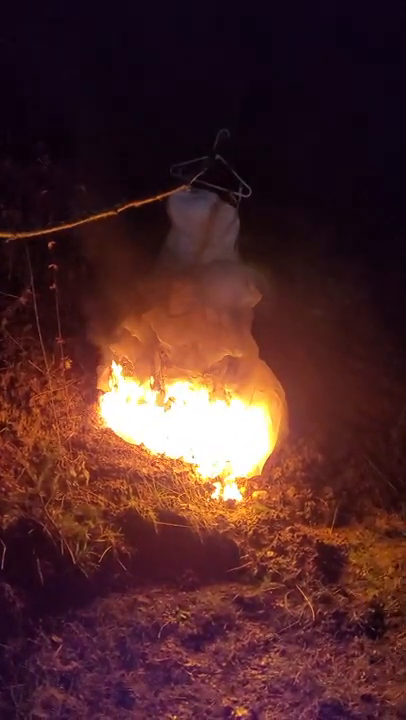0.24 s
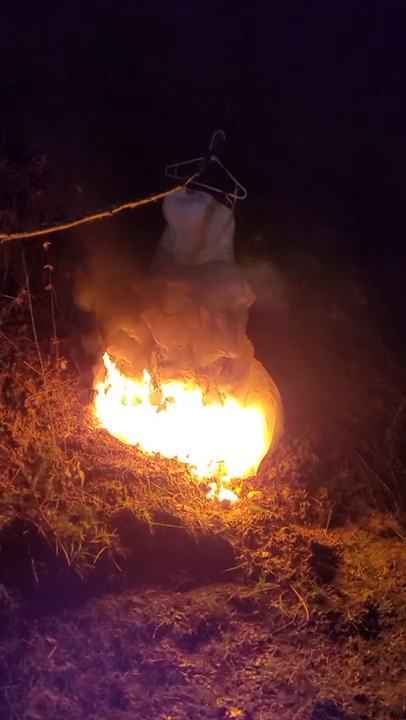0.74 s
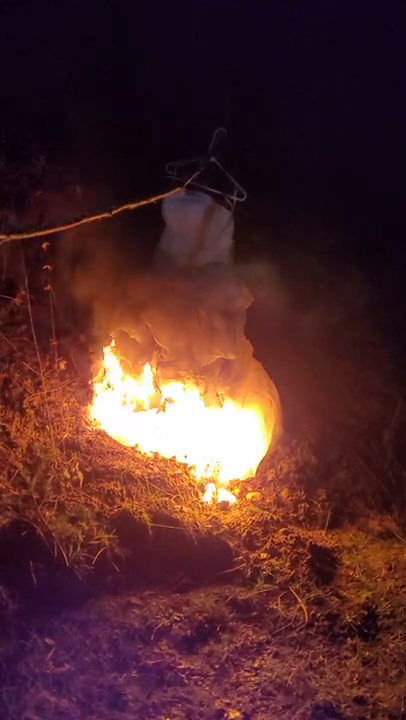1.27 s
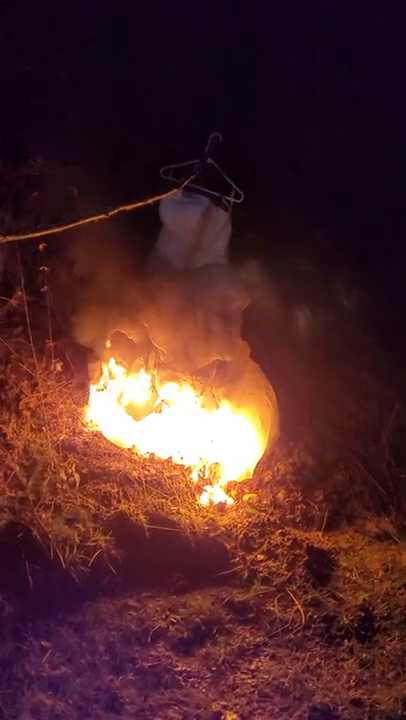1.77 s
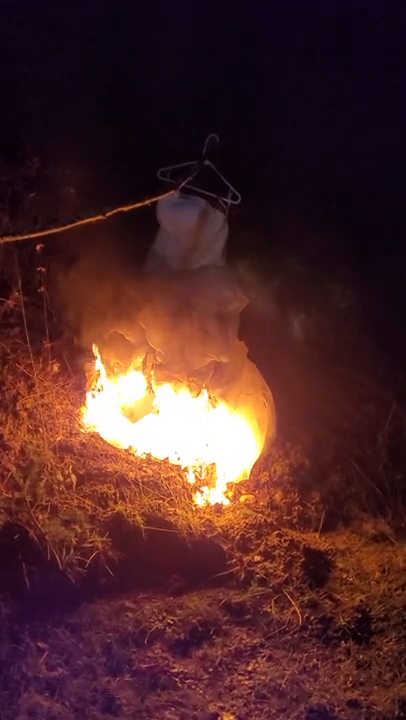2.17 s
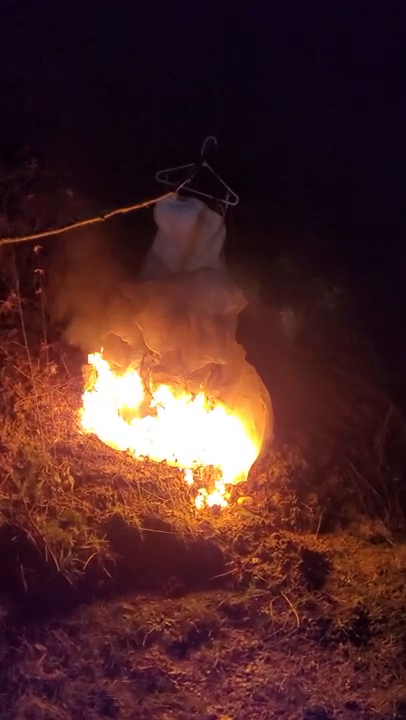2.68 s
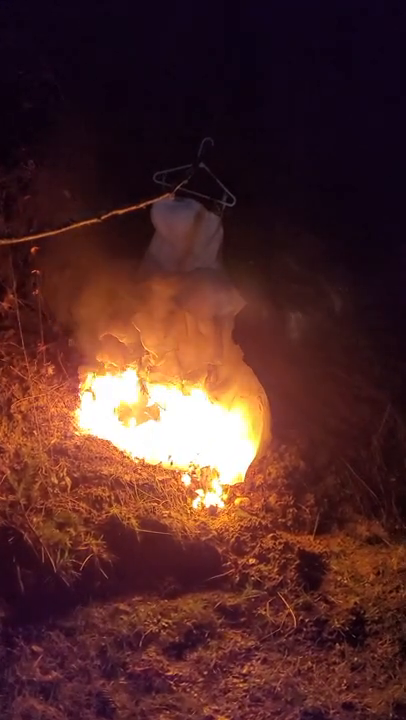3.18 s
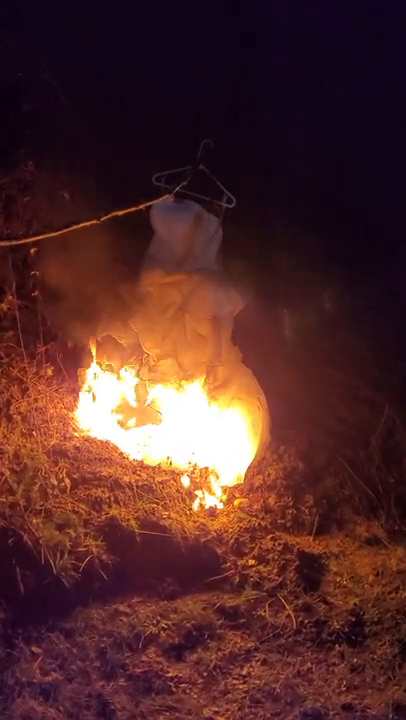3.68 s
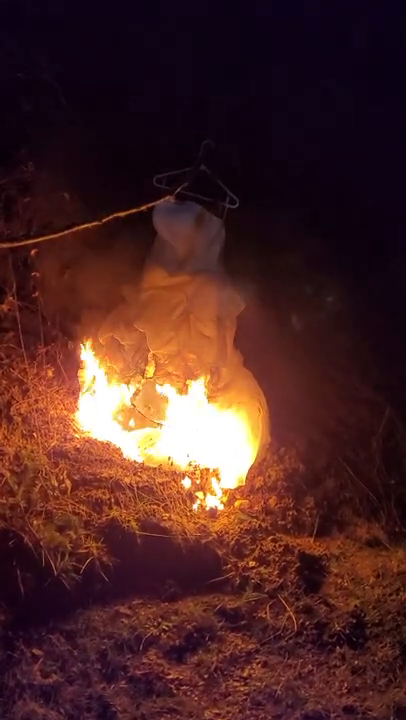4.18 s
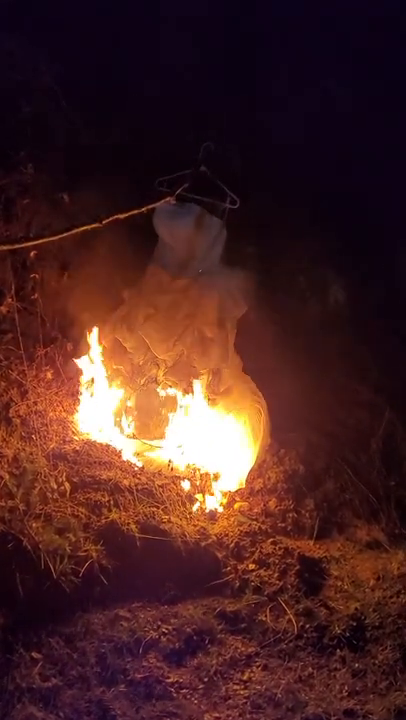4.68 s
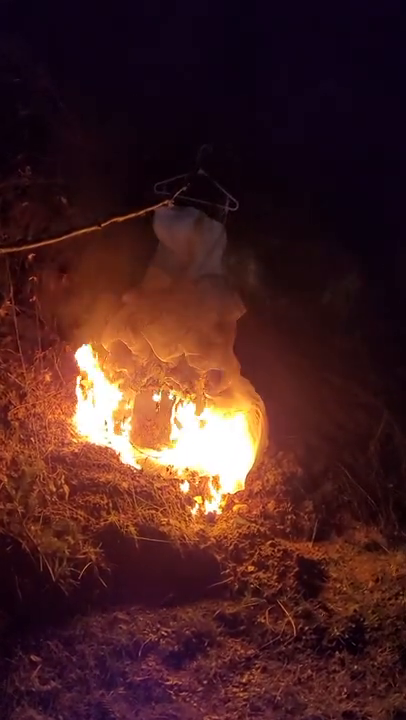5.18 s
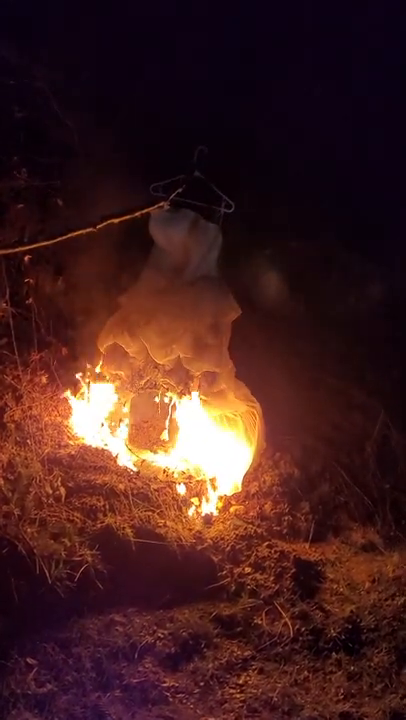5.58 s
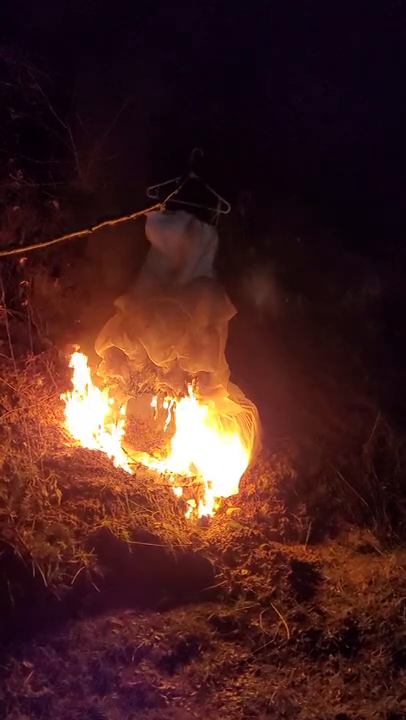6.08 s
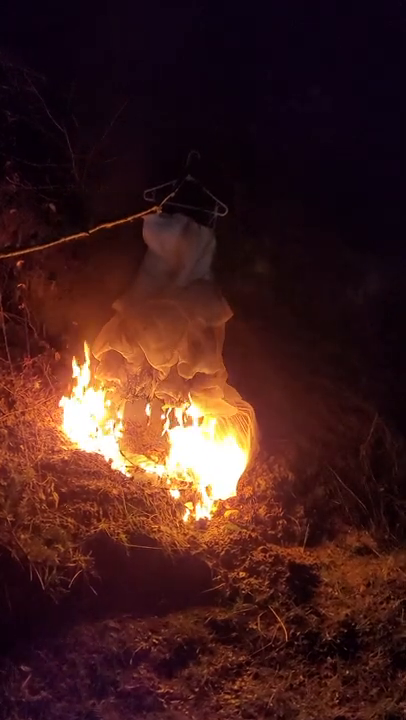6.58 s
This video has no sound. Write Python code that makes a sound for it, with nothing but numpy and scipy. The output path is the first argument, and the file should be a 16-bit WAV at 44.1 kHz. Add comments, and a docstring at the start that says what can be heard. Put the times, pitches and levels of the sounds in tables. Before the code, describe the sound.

Burning cloth and dry grass outdoors at night, about 7 seconds, in wide stereo with the crackle leaning right. A quiet low rumble and soft flickering roar run throughout, under thin gritty hiss and sizzle. It starts almost bare; from 0.4 to 0.7 s a tight flurry of sharp snaps arrives with a brief swell of hiss, then a strong snap at 0.86. Sparse pops follow, notably at 1.56, with faint vapour puffs between. From 2.3 to 3.2 s snaps come more often, ending in a bright pair at 3.2. After a thinner stretch, a dense cluster begins at 4.0 and peaks at 4.38 with the loudest crack, carrying a short low thump. Crackling stays busy to 5.5, including a cluster near 5.45, then scatters, with single snaps at 6.2 and 6.55 and a final flurry from 6.7. Each is dry, with a tiny scattered tail.

```python
"""Short cracks first: pockets of hot gas burst in a hanging cloth and the dry grass below it,
burning outdoors at night. Each is a pressure step, spiky tearing noise and scatter off ground and scrub.
Larger bursts add a low swing of air, and jets of vapour hiss in bands of their own.
Under them escaping gas hisses as noise with fine ticks, and the flames rumble and roar as flickering noise.
Two microphone ports hear it, the right one nearer the fire."""
import sys
import numpy as np
from scipy import signal
from scipy.fft import rfft, irfft, next_fast_len
from scipy.io import wavfile
from scipy.ndimage import uniform_filter1d

SR = 44100
rng = np.random.default_rng(int(sys.argv[2]) if len(sys.argv) > 2 else 0)


def store_pcm(level_fs):
    """Save levels as 16-bit WAV."""
    pcm = np.round(np.clip(level_fs, -1, 1) * 32767).astype(np.int16)
    wavfile.write(sys.argv[1], SR, np.atleast_2d(pcm).T)


N = 302085   # length in samples

# Bursts in cloth and grass. Each row: pressure step in seconds, nominal crack level in dB at 4.5 kHz,
# depth in dB (extra below the crack, before its share per band), edge in dB (the same above it),
# left over right in dB, tearing length in ms (tearing falls to 41 % in that time).
BURSTS = [(0.198, -69.5, 5, 4, -9, 1.0), (0.2961, -69, 4.5, 2.5, -13, 1.7),
          (0.4052, -48.5, -3.5, 1.5, -7, 1.6), (0.4572, -43.5, 5, 2.5, -7, 1.6),
          (0.4782, -39.5, -5.5, -4.5, -9, 2.5), (0.5018, -41.5, 3, -2.5, -7, 2.5),
          (0.5457, -51, -4, 6, -6, 1.1), (0.5616, -35, 1, 4.5, -14, 1.5), (0.565, -42, -2, 4, -4, 2.0),
          (0.5873, -36, -0.5, 1, -5, 1.9), (0.5928, -43, -11, 2, -21, 1.8),
          (0.6317, -46, 4.5, 7.5, -9, 1.8), (0.6651, -44, -7, -2, -11, 1.5),
          (0.6798, -49.5, -2, 3.5, -8, 0.82), (0.7517, -60, -5, -6, -11, 0.7),
          (0.8613, -34, -4, -0.5, -6, 1), (0.9962, -56, 0, -5, -6, 0.41), (1.0653, -75.5, 11, 6, -12, 1.3),
          (1.1358, -83, 18.5, 2, 3, 2.6), (1.2066, -68, 7.5, 1, -7, 0.9), (1.3047, -50, 2.5, -4.5, -7, 1.9),
          (1.3095, -61, -4, -4, -9, 1.4), (1.5602, -39, 3, 2.5, -3.5, 1.8),
          (1.5782, -43.5, -2, -4.5, -5, 0.9), (1.6474, -48, -15, 5, -10, 0.28),
          (1.7842, -71, 5, -7, -10, 0.9), (1.8131, -75.5, 11, -8, -10, 1.2),
          (1.9859, -45.5, -2.5, -13, -9, 0.63), (2.1172, -54, -1, -6.5, -14, 0.81),
          (2.1868, -60, 2, 1, -7, 1.4), (2.286, -39, 0, -1.5, -8, 1.8),
          (2.4541, -36.5, -5.5, -1.5, -7, 0.83), (2.5007, -55, 8, 4.5, -9, 1.6),
          (2.5416, -54.5, 3, 4, -5, 1.4), (2.6494, -45, -0.5, 3.5, -4, 1.7),
          (2.7472, -43.5, -3, 2.5, -8, 1.7), (2.787, -39, -1.5, -2, -7, 0.9),
          (2.7977, -38, -5, -7, -6, 0.79), (2.9272, -57, 4.5, -7, -12, 1.0),
          (2.9703, -36.5, -0.5, 0.5, -5, 0.94), (3.1552, -43, -1.5, -11.5, -4, 0.8),
          (3.1647, -61, 2, 3, -10, 1.5), (3.1831, -32, -8.5, -5, -13, 0.65),
          (3.1974, -36.5, -0.5, -1.5, -5, 1.5), (3.3293, -63, 1, 6.5, -8, 0.6),
          (3.4305, -51, 0, 1.5, -6, 0.75), (3.5539, -59.5, 0, 1, -7, 2), (3.6124, -60, 1, 3, -13, 0.7),
          (3.8184, -68, 9, 3, -8, 1.3), (3.8507, -65.5, 8, 1.5, -9, 1.9),
          (3.9274, -48.5, -0.5, -0.5, -8, 0.77), (4.0031, -34.5, -3.5, -7.5, -7.5, 1.6),
          (4.0192, -42.5, -1.5, -1.5, 0, 1.3), (4.0841, -40.5, 0.5, -2.5, -7, 1.3),
          (4.1094, -41.5, 2, 1.5, -5.5, 1.5), (4.1345, -41.5, 0, 3.5, -9, 0.97),
          (4.1426, -40, 3, -10, -5, 1), (4.1589, -51, 1, -1, -8, 2.2), (4.1696, -46, 2.5, -7, -9, 3.1),
          (4.173, -46.5, -3, 0, -4, 1.8), (4.2427, -56, 2.5, -2, -5, 0.89), (4.3457, -39.5, -6, 0, -8, 1.1),
          (4.3762, -24.5, 3, -2.5, -1.5, 0.97), (4.4545, -47, -3, 3.5, -3, 1.6),
          (4.4603, -44, -4.5, -16, -5, 1.2), (4.4691, -51, 2.5, 1, -7, 1.0),
          (4.644, -48, 1.5, -4, -10, 0.95), (4.7409, -58.5, 5, 0, -6, 1.6), (4.7687, -45, -4, -2, -9, 1.1),
          (4.8048, -43, -5.5, -0.5, -9, 0.98), (4.8571, -64, -3, 1.5, -3, 0.89),
          (4.919, -38, -7, -7, -5, 1.1), (4.95, -43, -2.5, -2, -9, 0.8), (5.0846, -52, -7, 5, -5, 1.9),
          (5.1978, -62.5, 2, 2, -8, 2.7), (5.2282, -41, -4, -3, -5, 3.7),
          (5.2415, -40.5, -3.5, -2.5, -15, 0.67), (5.2497, -38.5, -5.5, 2, -5, 0.72),
          (5.3286, -63, 5, 5, -7, 1.5), (5.3499, -44, 1.5, -3.5, -7, 1.0),
          (5.4429, -43.5, 1.5, -0.5, -6, 1.7), (5.4477, -41, -2.5, 6, -6, 0.89),
          (5.4619, -34.5, 1.5, -3, -8.5, 1.3), (5.4844, -51, -4, 2, -3, 1.6), (5.4962, -47, 2, 3, -3, 1.5),
          (5.7061, -47.5, -0.5, 3.5, -6, 2), (5.7466, -65, 5, 4, -5, 1.9), (5.7942, -47, -3, 5.5, -5, 0.68),
          (5.8974, -51.5, 0.5, 4, -6, 2), (6.0024, -64, -6, 0.5, -7, 1.6), (6.0569, -55, 1.5, 1, -8, 1.5),
          (6.2053, -38, 2, -4, -9, 1.7), (6.2612, -62, -6, -2, -6, 1.2), (6.3535, -62, 0, 0, -5, 1.8),
          (6.5531, -40.5, -1.5, 1.5, -7, 0.59), (6.702, -52.5, 1.5, 1, -5, 1.3),
          (6.7175, -43, 2.5, 3, -13, 1.3), (6.7236, -52, 4, -2, -3, 1.8), (6.7383, -52, -3, 6, -7, 1.3),
          (6.7422, -50.5, 3, 3, -5, 2.5), (6.8383, -38, 0.5, 0, -9, 0.74)]
FAINT_COUNT, FAINT_MS = 14, 0.76   # small cracks, tearing length in ms
FAINT_DB, FAINT_SPREAD_DB, FAINT_COLOUR_DB, FAINT_LEAN_DB = -72.5, 3.5, 3.5, -7


def all_pops():
    """The listed bursts, then faint ones at random moments."""
    when = rng.uniform(0.0076, N / SR - .01, FAINT_COUNT)
    chance = rng.standard_normal((FAINT_COUNT, 4))
    spread = [FAINT_SPREAD_DB, FAINT_COLOUR_DB, FAINT_COLOUR_DB, 3]
    faint = [FAINT_DB, 0, 0, FAINT_LEAN_DB] + chance * spread
    return np.vstack([BURSTS, np.column_stack([when, faint, np.full(FAINT_COUNT, FAINT_MS)])])


PUSH_S = .00006   # width of the pressure step, seconds


def push_and_tearing(tearing_ms, sides, draws, t):
    """The pocket wall gives way with a push and pull of pressure, then fibres tear as spiky noise."""
    fading = np.clip(t / 0.00014, 0, 1) * np.exp(-.9 * t / (np.maximum(tearing_ms, .1) / 1000))
    tearing = draws * np.abs(draws) * fading   # noise times its own size is spiky
    phase = t / PUSH_S - 2.5
    push = -4.0 * phase * np.exp(-phase ** 2 / 2)
    shared = push + tearing[:, 0]
    both_ports = np.stack([later(shared), shared], axis=1)
    return sides * (both_ports + from_db(-4) * tearing[:, 1:])


SCATTER_DB, SCATTER_PER_DB = -14, -0.0829   # scatter of a -43 dB crack; louder cracks are drier


def scatter_noise(crack_db, draws, lump_draws):
    """Echoes off ground and scrub: noise of uneven level, not yet dying away."""
    smooth = uniform_filter1d(uniform_filter1d(lump_draws, size=90), size=90)
    lumps_db = 0.95 * rms_one(smooth)
    return draws * from_db(lumps_db + SCATTER_DB + SCATTER_PER_DB * (crack_db + 43))


# Edges of a burst's colour: lower foot, then centres of thump, knock, crack, snap and air in Hz.
BAND_HZ = [180, 800, 2000, 4500, 8500, 13000]
# Usual colour of a burst: thump, knock, crack, snap and air in dB, added to the crack level.
USUAL_COLOUR = [-6.5, -3, 1, 2, -3.5]
# How far each of the five bands follows a burst's depth, then its edge: factors without unit.
FOLLOW_DEPTH = [1.42, 1.4, 0.1, 0.013, 0.22]
FOLLOW_EDGE = [0, 0, 0, 1.02, 1.35]
# Scatter as heard from the burst. Each row, one per band: ground and grass in dB over the scatter level,
# its t60 in seconds, far scrub in dB over the scatter level, its t60 in seconds.
ECHOES = [(2, 0.046, -13, 0.067), (2, 0.04, 0.5, 0.091), (3, 0.035, -3.5, 0.13), (4, 0.023, -2, 0.13),
          (5, 0.049, -1.5, 0.17)]
COLOUR_SPREAD_DB = 2   # each band of each burst strays by chance


def pops():
    """Bursting pockets: step and tearing set the crack band by band, near and far scatter trail it."""
    table, size, lead = all_pops(), 6144, 128   # samples per burst, samples before its step
    t = (np.arange(size) - lead) / SR
    draws = rng.standard_normal((len(table), 6, size))
    _, crack_db, depth_db, edge_db, lean_db, tearing_ms = table.T[:, :, None]
    sides = from_db(lean_db[:, None] / 2 * [[1], [-1]])
    crack = rfft(push_and_tearing(tearing_ms[:, None], sides, draws[:, :3], t))
    noise = rfft(scatter_noise(crack_db[:, None], draws[:, 3:5], draws[:, 5:]))
    levels_db = crack_db + USUAL_COLOUR + depth_db * FOLLOW_DEPTH + edge_db * FOLLOW_EDGE
    levels_db = levels_db + COLOUR_SPREAD_DB * draws[:, 5, :5]

    log_hz = np.log(np.arange(size // 2 + 1) * SR / size + 1)
    bursts = 0
    for peak, echo, level_db in zip(np.eye(6)[1:], ECHOES, levels_db.T):
        near_db, near_s, far_db, far_s = echo
        band = np.interp(log_hz, np.log(BAND_HZ), peak)   # overlapping bands make a smooth colour
        direct = irfft(crack * band)
        onset = direct[:, :, lead - 30:lead + 130]
        direct /= np.sqrt(np.mean(onset ** 2, axis=(1, 2), keepdims=True))
        dying = from_db(near_db - 60 * t / near_s) + from_db(far_db - 60 * t / far_s)
        scattered = irfft(noise * band) / np.sqrt(np.mean(band ** 2))
        scattered = scattered * dying * np.clip(t / 0.00013, 0, 1)
        # scatter leans half as far to one side as the crack
        bursts = bursts + from_db(level_db)[:, None, None] * (direct + scattered * np.sqrt(sides))

    out = np.zeros((2, N + size))
    for s, burst in zip(table[:, 0], bursts):
        first = round(s * SR) - lead
        out[:, first:first + size] += burst
    return out[:, :N]


# Large pockets also push air. Each row: start in seconds, level in dB before decay, left over right in dB.
AIR_PUSHES = [(0.4582, -42, -22), (1.561, -37, -12), (3.198, -32, 5), (4.1356, -47, 15),
              (4.3773, -21.5, 1.5), (6.7187, -36, -15)]
THUD_HZ, THUD_T60_S = 325, 0.0099


def thuds():
    """A low sine swing of air that falls by 60 dB in about three cycles."""
    out, t = np.zeros((2, N)), np.arange(4096) / SR
    for s, level_db, lean_db in AIR_PUSHES:
        swing = from_db(level_db - 60 * t / THUD_T60_S) * np.sin(2 * np.pi * THUD_HZ * t)
        first = round(s * SR)
        out[:, first:first + len(t)] += swing * from_db([[lean_db / 2], [-lean_db / 2]])
    return out


# Vapour from heated stalks. Each row: start in seconds, fade begins in seconds, level in dB before rise
# and fade, low edge in Hz, high edge in Hz.
VAPOUR = [(1.157, 1.403, -65.5, 7550, 14500), (1.49, 1.56, -62.5, 8500, 12900),
          (1.907, 1.96, -66, 5000, 15000), (3.33, 3.423, -63, 6000, 10700),
          (4.217, 4.376, -63, 7000, 12500), (4.63, 4.77, -61, 596, 2460), (4.893, 4.964, -58, 6500, 15000)]
JET_T60_S = 0.37


def jets():
    """Jets and puffs of vapour: band-passed noise that rises in 10 ms, holds and fades."""
    t, out = np.arange(N) / SR, np.zeros((2, N))
    air = turbulence([(300, 0), (15800, 0)], 0, 1.5, 20.0)
    for start, fade, level_db, low_hz, high_hz in VAPOUR:
        span = slice(round(start * SR), round((fade + JET_T60_S) * SR))
        band = signal.butter(2, [low_hz, high_hz], "band", fs=SR, output="sos")
        hiss = rms_one(signal.sosfilt(band, air[:, span]))
        rise = np.clip((t[span] - start) / .01, 0, 1)
        fading_db = level_db - 60 * np.maximum(t[span] - fade, 0) / JET_T60_S
        out[:, span] += rise * from_db(fading_db) * hiss
    return out


def gritty(spectrum, level_db, per_s, spread_db, grit_db):
    """Smooth hiss with tiny random ticks of charring fibres in it, denser as it swells."""
    density = per_s * from_db(level_db - np.median(level_db)) / SR
    sizes = from_db(spread_db * np.minimum(rng.exponential(1, (3, N)), 4))
    ticks = (rng.random((3, N)) < density) * sizes * rng.choice([-1, 1], (3, N))
    source = rng.standard_normal((3, N)) + from_db(grit_db) * rms_one(ticks)
    flicker_db = 2.0 * drift(7.2) + 0.67 * drift(2.0)
    return from_db(level_db + flicker_db) * spread_sound(source, spectrum)


# Escaping gas. Each row: time in seconds, hiss in dB, sizzle in dB, both before flicker.
GAS_LEVELS = [(0.0, -72.5, -74), (0.4, -71.5, -73), (0.57, -57.5, -69), (0.74, -73.5, -74),
              (1.16, -73, -75.5), (1.43, -72.5, -74.5), (1.75, -74, -73.5), (2.46, -70.5, -72),
              (2.82, -69, -67.5), (3.11, -70, -69.5), (3.83, -69, -70), (4.25, -65, -65.5),
              (4.52, -68.5, -67), (5.07, -68.5, -69), (5.42, -68.5, -68.5), (5.89, -70, -70),
              (6.56, -69.5, -70), (6.85, -65.5, -69)]
# Colour of the hiss, then of the sizzle. Each row: frequency in Hz, relative density in dB per Hz.
HISS_COLOUR = [(790, -23), (1350, 1.5), (1500, 1.5), (3030, 4), (4320, -0.5), (6500, 1.5), (8450, -28),
               (14300, -120)]
SIZZLE_COLOUR = [(3820, -25), (6500, -15.5), (8430, 1), (9340, -4.5), (15100, -5.5), (15800, -18),
                 (16200, -22)]


def gas():
    """Escaping gas: a broad hiss and a higher sizzle, both gritty."""
    hiss_db, sizzle_db = in_time(GAS_LEVELS)
    return gritty(HISS_COLOUR, hiss_db, 210, 2.2, -5) + gritty(SIZZLE_COLOUR, sizzle_db, 170, 3.9, -8)


# The blaze. Each row: time in seconds, rumble in dB, roar in dB, both before flicker.
BLAZE_LEVELS = [(0.0, -56.5, -63), (1.77, -56.5, -62.5), (3.63, -55.5, -60.5), (4.66, -56, -61),
                (4.81, -55, -57.5), (5.42, -54.5, -60), (6.01, -56.5, -60.5), (6.85, -55, -57.5)]
# Colour of the rumble, then of the roar. Each row: frequency in Hz, relative density in dB per Hz.
RUMBLE_COLOUR = [(13, -41), (22, -23), (59, 0.5), (86, 0), (203, -3), (280, -15.5), (360, -93), (620, -120)]
ROAR_COLOUR = [(160, -3.5), (270, -2), (610, -2.5), (826, -1.5), (971, -12), (1210, -6), (1450, -20.5),
               (1880, -20.5), (3190, -64)]


def flames():
    """Flames move gas: a low rumble that flickers slowly and a roar that flickers faster."""
    rumble_db, roar_db = in_time(BLAZE_LEVELS)
    return turbulence(RUMBLE_COLOUR, rumble_db, 0.94, 2.3) + turbulence(ROAR_COLOUR, roar_db, 1.66, 6.9)


def turbulence(spectrum, level_db, flicker_db, flicker_hz):
    """Noise of moving gas whose level flickers."""
    noise = spread_sound(rng.standard_normal((3, N)), spectrum)
    return from_db(level_db + flicker_db * drift(flicker_hz)) * noise


# Between the ports. Each row: frequency in Hz, share heard alike by both ports.
ALIKE = [(60, 0.94), (180, 1), (300, 0.78), (700, 0.47), (1500, 0.37), (4000, 0.2), (15000, 0.075)]
# Balance of the ports. Each row: frequency in Hz, left over right in dB.
BALANCE = [(60, -1.2), (180, -0.6), (400, -1), (1300, -5), (8000, -5.5), (15000, -3.5)]


def spread_sound(source, spectrum):
    """Colour three unrelated signals and mix them to a wide stereo pair; mid rms 1."""
    size = next_fast_len(N)
    hz = np.arange(size // 2 + 1) * SR / size
    inside = (hz > spectrum[0][0]) & (hz < spectrum[-1][0])
    shared, left, right = rfft(source, size) * from_db(at_hz(spectrum, hz)) * inside
    alike, lean = np.clip(at_hz(ALIKE, hz), 0, 1), from_db(at_hz(BALANCE, hz) / 2)
    late = shared * port_lag(hz)
    pair = [lean * (np.sqrt(alike) * late + np.sqrt(1 - alike) * left),
            (np.sqrt(alike) * shared + np.sqrt(1 - alike) * right) / lean]
    pair = irfft(np.array(pair), size)[:, :N]
    return pair / np.sqrt(np.mean(pair.mean(axis=0) ** 2))


# Lag of the left port. Each row: frequency in Hz, lag in radians.
LEFT_LAG = [(300, 0.05), (650, 0.77), (2500, 1.23), (6000, 2.25), (14000, 1.3)]


def port_lag(hz):
    """Phase turn of a shared sound at the left port, farther from the fire."""
    return np.exp(-1j * at_hz(LEFT_LAG, hz))


def later(x):
    """What the left port makes of a sound that both ports hear."""
    size = x.shape[-1]
    return irfft(rfft(x) * port_lag(np.arange(size // 2 + 1) * SR / size), size)


def drift(rate):
    """Slow chance: sparse noise through a double one-pole low-pass at rate Hz; spread 1."""
    r = np.exp(-80 * np.pi * rate / SR)   # one draw per 40 samples
    slow = signal.lfilter([1], [1, -2 * r, r * r], rng.standard_normal(N // 40 + 2002))[2000:]
    return np.interp(np.arange(N) / 40, np.arange(len(slow)), rms_one(slow))


def in_time(rows):
    """Columns of a curve table, sample by sample."""
    s, *columns = np.transpose(rows)
    return [np.interp(np.arange(N) / SR, s, c) for c in columns]


def at_hz(points, hz):
    """Read a (Hz, value) table on a log axis."""
    point_hz, values = np.transpose(points)
    return np.interp(np.log(hz + 1), np.log(point_hz), values)


def from_db(db):
    """Level to gain."""
    return 10 ** (np.asarray(db) / 20)


def rms_one(x):
    """Scale to rms 1."""
    return x / np.sqrt(np.mean(x ** 2) + 1e-20)


def scene():
    """Bursts, air pushes, jets, escaping gas and flames."""
    return pops() + thuds() + jets() + gas() + flames()


RIGHT_DULL_HZ, CUTOFF_HZ = 10860, 16800   # right port's low-pass; stopband edge for both
OVERLOAD = .62   # ceiling that rounded peaks approach, of full scale


def record(dry):
    """The right port is duller at the top; the highest peaks are rounded; the top is cut."""
    dull = signal.butter(2, RIGHT_DULL_HZ, fs=SR, output="sos")
    pair = np.array([dry[0], signal.sosfilt(dull, dry[1])])
    pair = pair / (1 + (pair / OVERLOAD) ** 4) ** .25
    return signal.sosfilt(signal.cheby2(20, 60, CUTOFF_HZ, fs=SR, output="sos"), pair)


dry = scene()
out = record(dry)
store_pcm(out)
```